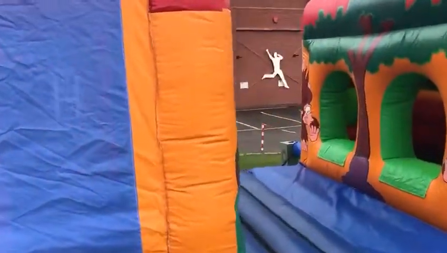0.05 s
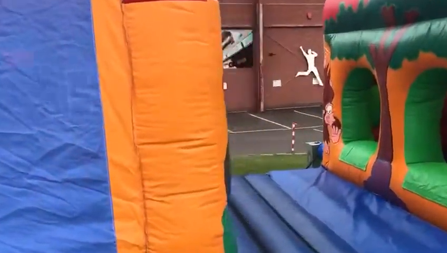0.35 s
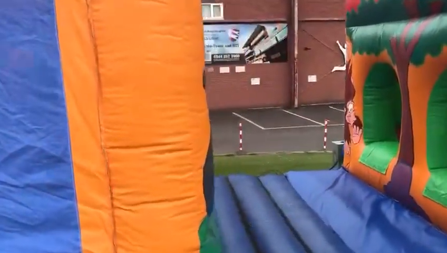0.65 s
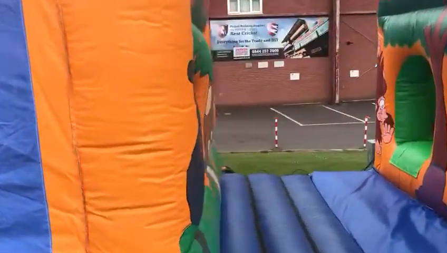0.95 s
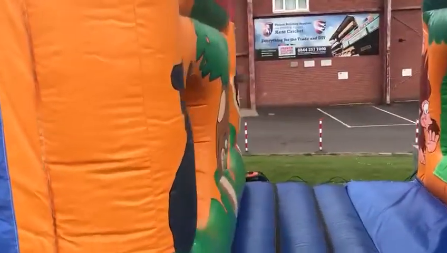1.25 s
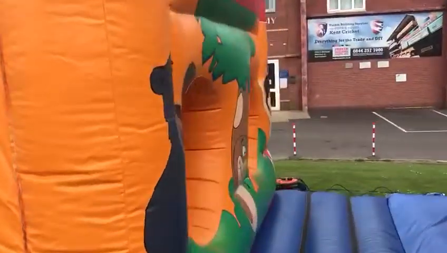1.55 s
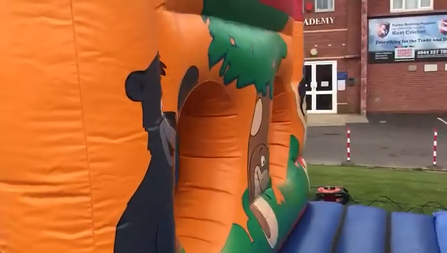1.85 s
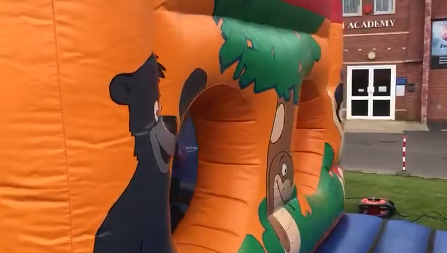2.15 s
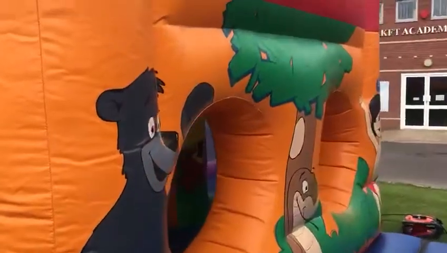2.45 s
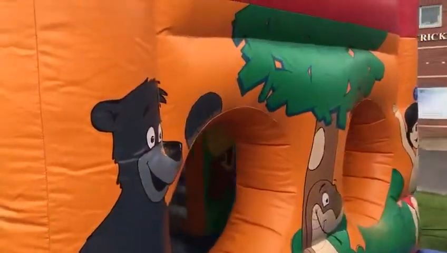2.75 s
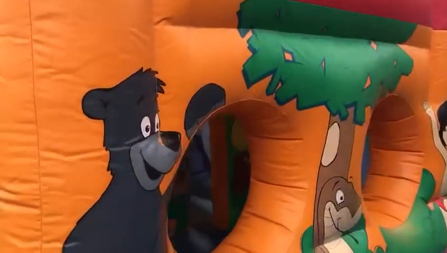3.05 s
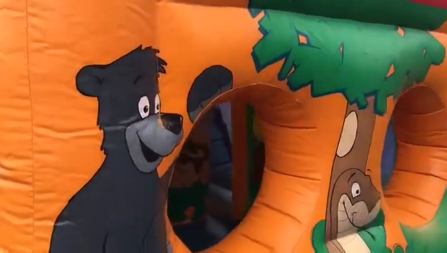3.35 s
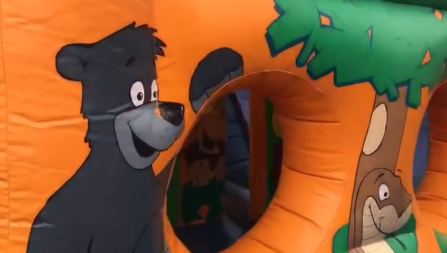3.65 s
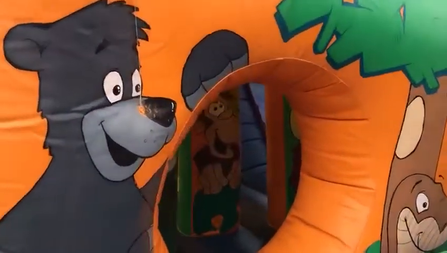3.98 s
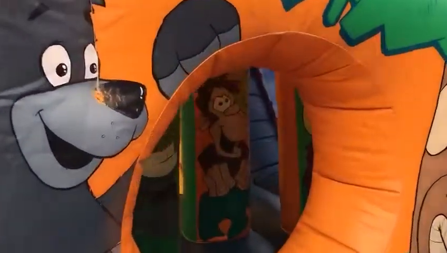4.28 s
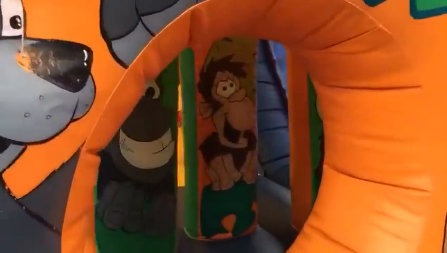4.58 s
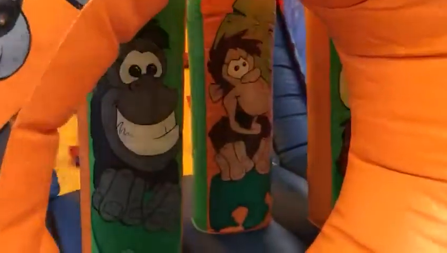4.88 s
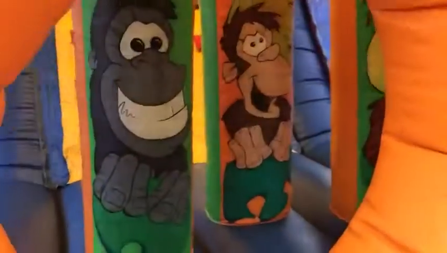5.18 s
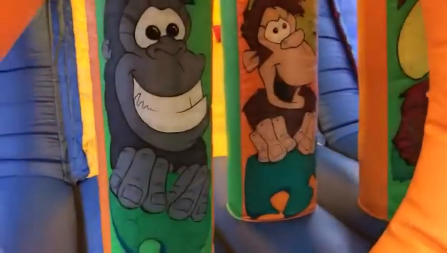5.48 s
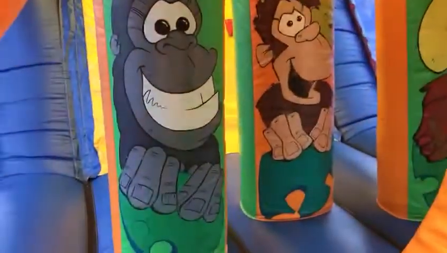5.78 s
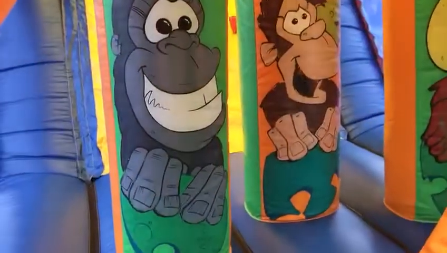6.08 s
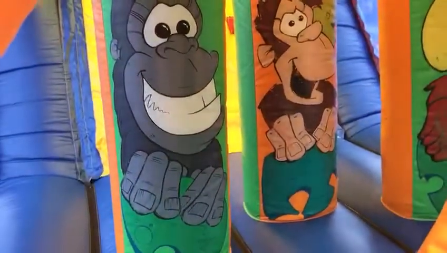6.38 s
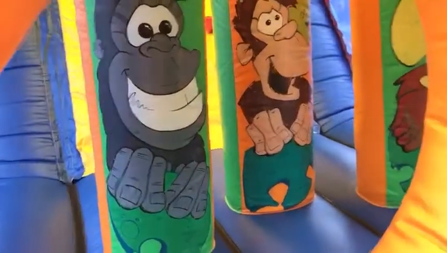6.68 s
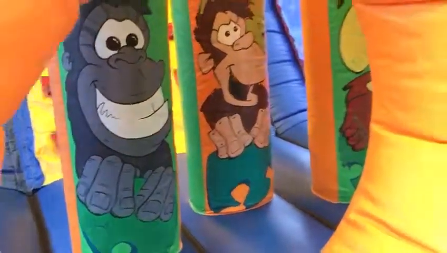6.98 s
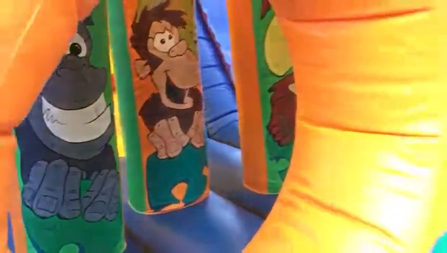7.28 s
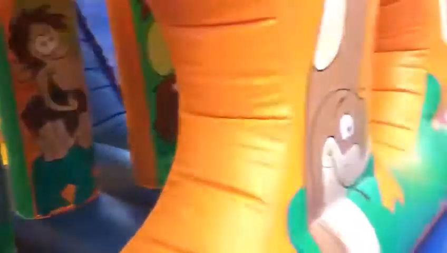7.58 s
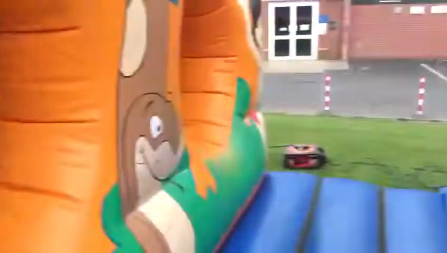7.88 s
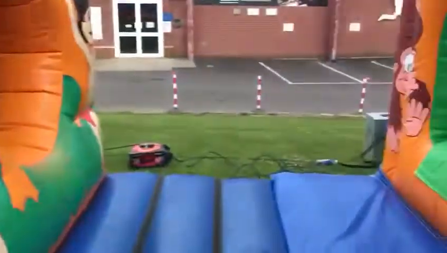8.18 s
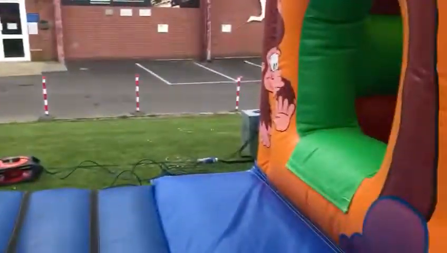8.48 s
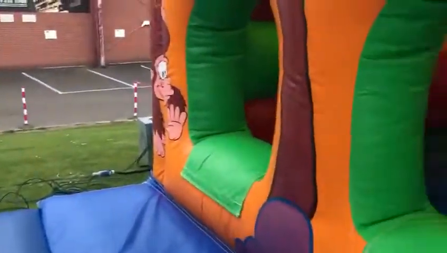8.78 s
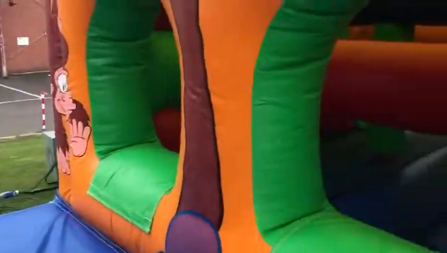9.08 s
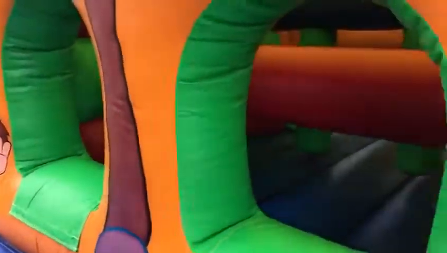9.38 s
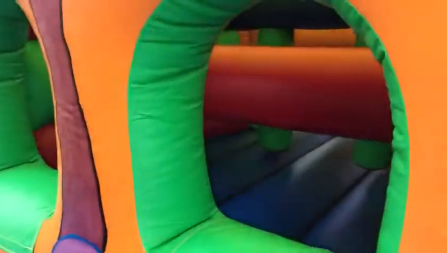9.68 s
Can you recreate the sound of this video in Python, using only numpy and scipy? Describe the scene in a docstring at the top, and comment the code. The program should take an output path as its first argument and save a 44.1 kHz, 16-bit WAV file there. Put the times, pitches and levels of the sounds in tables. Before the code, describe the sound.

A blower keeps an inflatable castle filled outdoors, making a low drone under a steady rush of air. The tone shifts slightly as the microphone moves along the vinyl walls. About halfway through, wind starts hitting the microphone in loud, uneven bursts with deep rumble and sharp thumps. The gusts then thin out to a few weaker puffs, and the blower carries on.

```python
"""A low fan drone under a rush of air: a blower keeps an inflatable castle filled on open grass.
Turbulence in the casing makes the drone; air through the resonant housing makes the rush.
Reflections from the vinyl walls sweep its colour as the microphone moves along them.
Wind buffets the microphone in uneven bursts, hardest at the opening in the wall."""
import sys
import numpy as np
from scipy import signal
from scipy.fft import rfft, irfft
from scipy.io import wavfile
from scipy.ndimage import map_coordinates

SR = 44100
rng = np.random.default_rng(int(sys.argv[2]) if len(sys.argv) > 2 else 0)


def bounce(signal):
    """Save signal as a 16-bit WAV file at the path given by the first command-line argument."""
    frames = np.transpose(np.atleast_2d(signal))
    limited = np.clip(frames, -1, 1)
    pcm = np.round(limited * 32767).astype(np.int16)
    wavfile.write(sys.argv[1], SR, pcm)


N = 433503
TIME_S, FREQ_HZ = np.arange(N) / SR, np.fft.rfftfreq(N, 1 / SR)

# gusts on the microphone: start_s, length_s, level_db, high_edge_hz
GUSTS = [(4.155, 0.043, -28.5, 800), (4.703, 0.063, -23, 230), (4.782, 0.049, -15.5, 315),
         (4.94, 0.13, -20.5, 288), (5.268, 0.19, -28, 397), (5.535, 0.14, -12.5, 353),
         (5.741, 0.086, -12.5, 680), (5.848, 0.0085, -11.5, 1170), (5.865, 0.073, -18, 553),
         (5.97, 0.047, -19.5, 400), (6.027, 0.13, -15, 490), (6.203, 0.048, -19.5, 497),
         (6.287, 0.11, -13, 320), (6.418, 0.035, -17, 350), (6.504, 0.17, -16, 294),
         (6.666, 0.093, -16, 370), (6.806, 0.13, -20, 360), (7.085, 0.096, -18.5, 412),
         (7.452, 0.026, -28, 600), (8.116, 0.047, -22.5, 377), (8.45, 0.025, -29, 400),
         (8.866, 0.022, -26, 150), (9.06, 0.038, -27, 220)]


def gain_of(db):
    """Decibels to amplitude."""
    return 10 ** (np.asarray(db) / 20)


def unit_rms(x):
    """Scale to an rms of one."""
    return x / np.sqrt(np.mean(x ** 2) + 1e-20)


def follow(rows, t):
    """Each column after the first, interpolated at times t."""
    time_s, *columns = np.transpose(rows)
    return [np.interp(t, time_s, column) for column in columns]


def noise(spectrum):
    """Unit-rms noise shaped by rows of freq_hz, density_db."""
    freq_hz, density_db = np.transpose(spectrum)
    shape_db = np.interp(np.log(FREQ_HZ + 1), np.log(freq_hz), density_db)
    return unit_rms(irfft(rfft(rng.standard_normal(N)) * gain_of(shape_db), N))


def wander(rate_hz):
    """Slow random motion of unit rms."""
    return unit_rms(irfft(rfft(rng.standard_normal(N)) / (1 + (FREQ_HZ / rate_hz) ** 4), N))


def add(mix, start_s, sound):
    """Mix a sound in at start_s."""
    part = mix[max(round(start_s * SR), 0):][:len(sound)]
    part += sound[:len(part)]


def stft(x):
    """Frequency column, time row and short-time spectra."""
    hz, t, spectra = signal.stft(x, SR, nperseg=2048)
    return hz[:, None], t, spectra


def istft(spectra):
    """Short-time spectra back to sound."""
    return signal.istft(spectra, SR)[1][:N]


def bell(offset_hz, width_hz):
    """Resonance curve, one at its centre."""
    return 1 / (1 + (2 * offset_hz / width_hz) ** 2)


def blooms_db(hz, t, width_hz=107):
    """Bands of the blower swell or sink as the microphone passes spots along the walls."""
    # time_s, reach_s, centre_hz, lift_db
    spots = [(1.2, 0.27, 70, -6.5), (1.9, 0.23, 1570, 10), (2, 0.68, 3240, 6.5), (2.68, .065, 3630, 16),
             (4.5, .6, 5700, 9), (4.65, 0.14, 2350, 10.5), (4.97, .13, 2020, 6.5), (5.55, 0.3, 1530, 12),
             (6.4, .6, 2070, 6), (7.56, .18, 2040, 12.5), (7.48, 0.23, 2300, 8.5), (8.5, .25, 2020, 6),
             (8.45, 0.59, 2540, 6), (8.9, 0.27, 2280, 5), (9.2, 1, 3550, 7)]
    return sum(lift_db * bell(hz - centre_hz, width_hz) * np.exp(-((t - time_s) / reach_s) ** 2)
               for time_s, reach_s, centre_hz, lift_db in spots)


def drone(throb_db=0.5, hollow_width_hz=110):
    """Turbulence in the fan casing: a low, slightly throbbing roar."""
    # fan and casing: freq_hz, density_db
    spectrum = [(20, -30), (33, -9), (48, -3.5), (75, 2.5), (110, -7), (170, 0), (240, -6.5), (320, -13.5),
                (420, -18), (650, -20), (1100, -49.5)]
    # time_s, level_db
    levels = [(0, -40), (1.1, -37), (1.8, -38.5), (2.7, -34.5), (3.8, -32), (5, -31.5), (7.2, -37.5),
              (8, -41.5), (8.8, -36), (9.83, -36)]
    # hollow band, sinking as the microphone nears the wall: time_s, centre_hz, lift_db
    hollow = [(0, 380, 6.5), (.7, 364, 8), (1.4, 316, 12), (2, 287, 9.5), (2.4, 262, 0.5), (2.9, 240, -4),
              (9.83, 240, 2.5)]
    hz, t, spectra = stft(noise(spectrum))
    centre_hz, lift_db = follow(hollow, t)
    level_db, = follow(levels, TIME_S)
    hollow_db = lift_db * bell(hz - centre_hz, hollow_width_hz)
    roar = istft(spectra * gain_of(hollow_db + blooms_db(hz, t)))
    return roar * gain_of(level_db + throb_db * wander(rate_hz=24))


def rush(trim_db=2.0, flutter_db=0.58, hiss_hz=4700, swell_db=0.64, swell_rate_hz=0.92):
    """Air rushes through the housing, whose resonances swell and fade; the walls shade its hiss."""
    # airflow: freq_hz, density_db
    spectrum = [(150, 5.5), (500, -0.5), (850, -2), (1200, 0.5), (1750, 1.5), (2400, 1.5), (3700, -0.5),
                (5000, -5.5), (6000, -5.5), (7600, -13), (9500, -15), (10500, -20.5), (11600, -19.5),
                (13000, -71)]
    # at the microphone: time_s, level_db, relative_hiss_db
    levels = [(0, -44, -2), (1.1, -44, -5.5), (2.05, -41, -7.5), (2.5, -40.5, -4.5), (3.5, -39.5, -7.5),
              (4.5, -38.5, -6.5), (5.3, -40, -5.5), (5.85, -43, -4), (6.3, -41, -6), (7.1, -40.5, -5),
              (7.55, -39, -0.5), (8.1, -40, -3), (8.7, -38.5, -4), (9.83, -40, -6)]
    # housing and duct: centre_hz, width_hz, lift_db
    resonances = [(714, 31, 2.5), (1092, 126, 4.5), (1510, 75, 1.5), (2005, 60, 4), (2450, 62, 2),
                  (3260, 150, -2), (4410, 71, 4.5), (5550, 390, 2.5), (6000, 53, 5.5), (6420, 82, 7),
                  (7100, 200, 3.5)]
    hz, t, spectra = stft(noise(spectrum))
    level_db, hiss_db = follow(levels, t)
    housing_db = 0
    for centre_hz, width_hz, lift_db in resonances:
        swell = np.interp(t, TIME_S, wander(swell_rate_hz))
        housing_db += (lift_db + swell_db * swell) * bell(hz - centre_hz, width_hz)
    shade_db = (hiss_db - hiss_db.mean()) * hz ** 4 / (hz ** 4 + hiss_hz ** 4)
    air = unit_rms(istft(spectra * gain_of(housing_db + blooms_db(hz, t) + shade_db)))
    return air * gain_of(trim_db + np.interp(TIME_S, t, level_db) + flutter_db * wander(rate_hz=19))


def wall_reflections(x):
    """Two walls each add an echo; the changing delays sweep the colour of the rush."""
    # each wall: time_s, delay_ms, echo_gain
    first_wall = [(0, 1.5, .03), (1.6, 1.08, .1), (2.4, 1.75, 0.22), (3.3, 2.8, 0.05), (4.5, 2.4, 0.09),
                  (5.3, 1.58, 0.21), (6.6, 1.44, 0.13), (7.4, 1.78, 0.1), (8.1, 1.42, .2),
                  (8.55, 1.65, 0.18), (9.5, 1.97, 0.06)]
    second_wall = [(0, 1.1, .06), (1.5, 0.93, 0.022), (5.1, 0.81, 0.072), (6.1, 1.1, 0.2), (6.6, 1.08, .16),
                   (7.5, 1.45, 0.12), (8.15, 1.36, 0), (8.6, 2.67, 0.17), (9.83, 3.07, .18)]
    out = x.copy()
    for wall in (first_wall, second_wall):
        delay_ms, echo_gain = follow(wall, TIME_S)
        read_index = (TIME_S - delay_ms / 1000) * SR
        out += echo_gain * map_coordinates(x, [read_index], order=3)
    return out


def tube_scatter(x, echo_gain=0.11, drift_ms=0.25, spread_ms=16, count=14):
    """Weak, drifting echoes off the vinyl tubes comb the sound into fine bands."""
    hz, t, spectra = stft(x)
    comb = 1
    for place, pace, phase in rng.random((count, 3)):
        delay_ms = 3 + spread_ms * place + drift_ms * np.sin((0.413 + pace) * t + 2 * np.pi * phase)
        comb += echo_gain * np.cos(2 * np.pi * hz * delay_ms / 1000)
    return istft(spectra * comb)


def breeze(lump_db=4.5):
    """Light wind slides over the microphone: a lumpy low rumble."""
    # freq_hz, density_db
    spectrum = [(18, -20), (35, -9.5), (52, -0.5), (100, -3.5), (200, -15.5), (400, -26), (800, -39),
                (1600, -86)]
    # time_s, level_db
    levels = [(0, -47), (2, -60), (3.2, -41.5), (4.4, -38), (4.7, -27), (5.45, -24), (5.8, -20.5),
              (6.6, -19), (7.05, -37.5), (7.35, -39.5), (7.6, -25), (8.2, -25), (8.55, -36.5), (9.83, -40)]
    level_db, = follow(levels, TIME_S)
    rumble = noise(spectrum) * gain_of(lump_db * wander(rate_hz=16.7))
    return unit_rms(rumble) * gain_of(level_db)


def buffets(rise_s=0.0131, fall_s=0.037, low_edge_hz=49.4, rolloff=6.44, trim_db=-1.5):
    """Each gust is a burst of pink turbulence that breaks into eddies; the strongest spit highest."""
    eddy_rate_hz, eddy_db = 45, 2.5
    spit_hz, spit_db = 457, 2  # extra flutter above spit_hz
    out = np.zeros(N)
    hz = np.fft.rfftfreq(16384, 1 / SR)[1:]
    eddies = wander(eddy_rate_hz)
    spit_share = hz ** 4 / (hz ** 4 + spit_hz ** 4)
    for start_s, length_s, level_db, high_edge_hz in GUSTS:
        power = 1 / hz / (1 + (low_edge_hz / hz) ** 4) / (1 + (hz / high_edge_hz) ** rolloff)
        spectrum = np.sqrt(power) * np.exp(2j * np.pi * rng.random(len(hz)))
        rumble = irfft(np.r_[0, spectrum * (1 - spit_share)])
        spit = irfft(np.r_[0, spectrum * spit_share])
        t = np.arange(len(rumble)) / SR
        eddy = np.interp(start_s + t, TIME_S, eddies)
        ramp = np.clip(np.minimum(t / rise_s, (length_s - t) / fall_s + 0.5), 0, 1)
        envelope = np.sin(np.pi / 2 * ramp) ** 2
        burst = (rumble + spit * gain_of(spit_db * eddy)) * gain_of(eddy_db * eddy) * envelope
        burst *= np.sqrt(length_s * SR / np.sum(burst ** 2))  # unit rms over length_s
        add(out, start_s - rise_s / 2, gain_of(level_db + trim_db) * burst)
    return out


def vortex(pitch_hz, width_rad=2.84):
    """A vortex core crosses the microphone port: the pressure drops, then snaps back."""
    phase = 2 * np.pi * pitch_hz * np.arange(-900, 900) / SR
    swing = np.sin(phase) * np.exp(-(phase / width_rad) ** 2)
    return swing / swing.max()


def slaps(rate_hz=40, small_db=-1.5, spread_db=7.5, pitch_ratio=0.78, spread_oct=1.6, max_per_gust=12):
    """Big vortices strike at set times; gusts shed small ones that follow their level and pitch."""
    # hardest pressure slaps: time_s, peak_db, pitch_hz
    big_vortices = [(5.629, -1, 241), (5.709, -11.5, 426), (5.742, -3, 227), (5.776, 1, 393),
                    (5.878, -12, 300), (6.034, -12, 420), (6.096, -11, 527), (6.137, -6.5, 263),
                    (6.34, -6, 70), (6.372, 1.5, 250), (7.098, -6.5, 390), (8.056, -10, 404)]
    strikes = list(big_vortices)
    for start_s, length_s, level_db, high_edge_hz in GUSTS:
        jitter, size, pitch = rng.random((max_per_gust, 3)).T
        after_s = (np.arange(max_per_gust) + jitter) / rate_hz
        peak_db = level_db + small_db + spread_db * (size - pitch)
        pitch_hz = high_edge_hz * pitch_ratio * 2 ** (spread_oct * (pitch - 0.5))
        strikes += list(np.c_[start_s + after_s, peak_db, pitch_hz][after_s < length_s])
    out = np.zeros(N)
    for time_s, peak_db, pitch_hz in strikes:
        swing = vortex(pitch_hz)
        add(out, time_s - len(swing) / 2 / SR, gain_of(peak_db) * swing)
    return out


def scene():
    """The blower among the walls, plus wind on the microphone; mono."""
    blower = drone() + tube_scatter(wall_reflections(rush()))
    return (blower + breeze() + buffets() + slaps())[None]


def record(dry, low_cut_hz=37, high_cut_hz=12050):
    """The microphone sheds deep bass and rounds off the largest peaks; a low-pass follows."""
    highpass = signal.butter(5, low_cut_hz, "high", fs=SR, output="sos")
    lowpass = signal.firwin(511, high_cut_hz, window=("kaiser", 9), fs=SR)
    x = signal.sosfilt(highpass, dry)
    rounded = x / (1 + x ** 4) ** (1 / 4)
    return signal.oaconvolve(rounded, lowpass[None], "same")


dry = scene()
out = record(dry)
bounce(out)
```